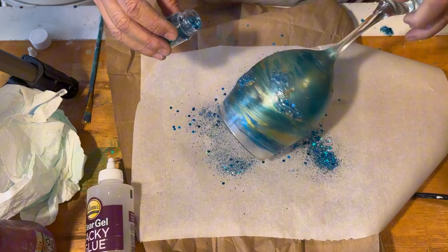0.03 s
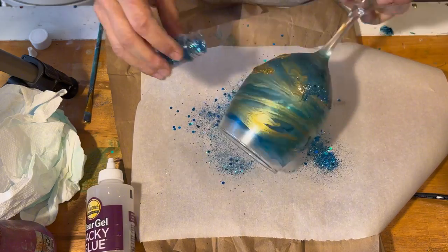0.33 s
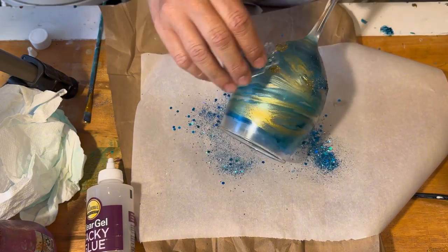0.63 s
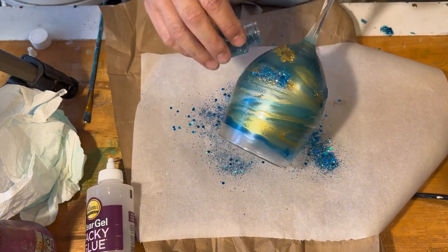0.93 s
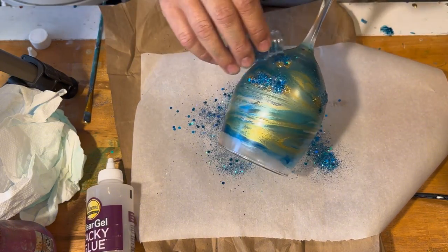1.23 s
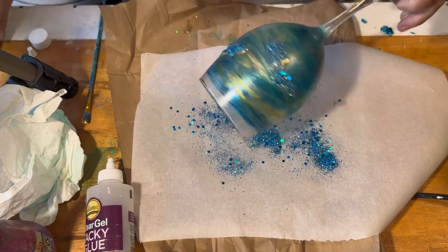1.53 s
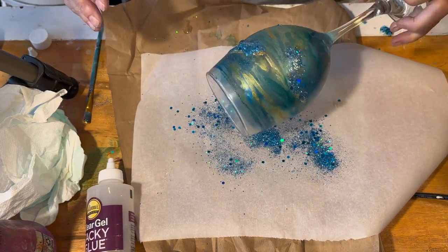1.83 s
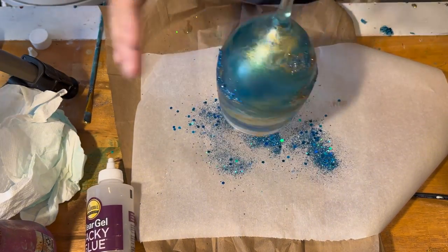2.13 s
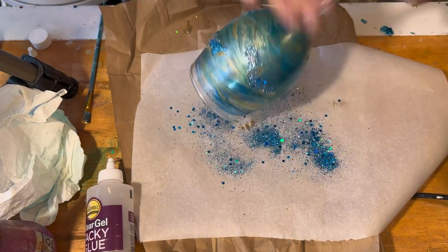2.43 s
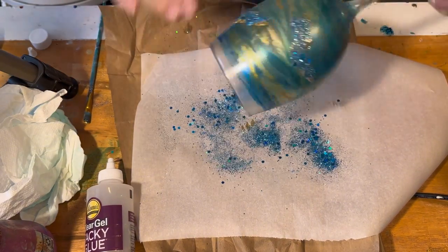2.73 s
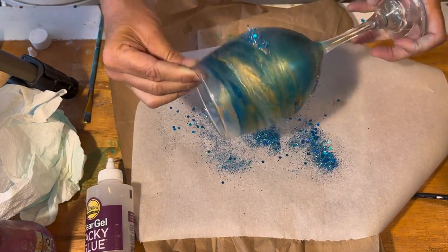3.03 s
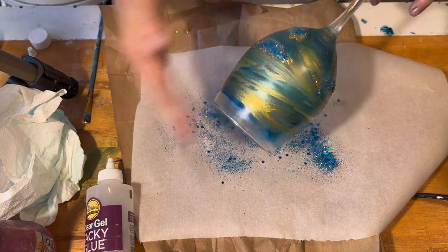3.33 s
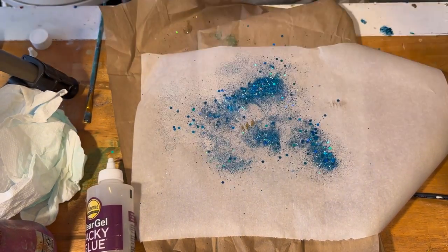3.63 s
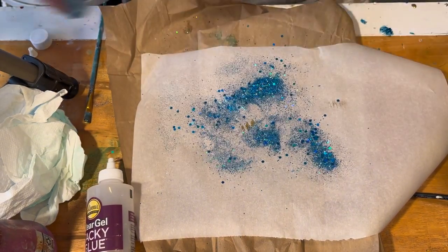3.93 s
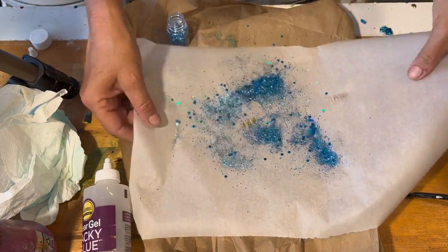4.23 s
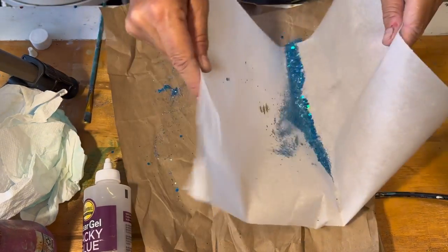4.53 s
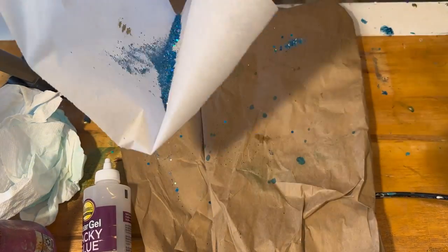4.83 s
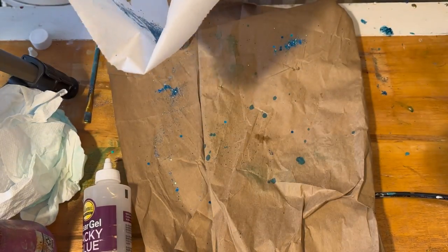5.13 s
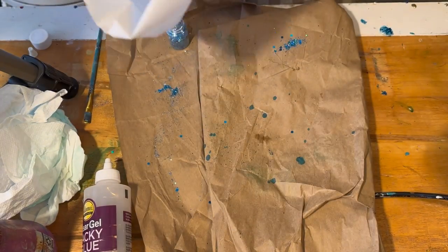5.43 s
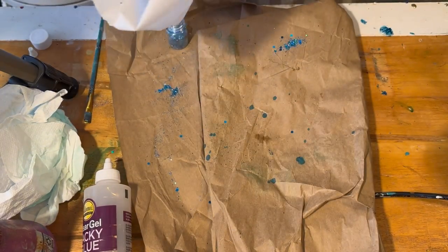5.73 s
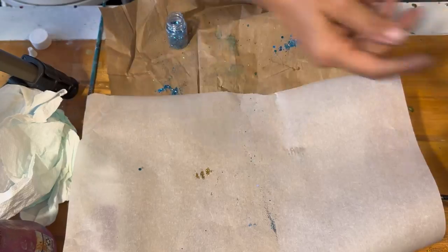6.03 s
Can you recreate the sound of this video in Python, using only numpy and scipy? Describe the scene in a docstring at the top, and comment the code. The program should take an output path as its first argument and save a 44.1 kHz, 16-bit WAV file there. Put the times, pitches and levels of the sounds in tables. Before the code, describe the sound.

A faint hum fills a small room, with a low rumble that cuts off just before 1 second. At the start a wine glass scrapes lightly on paper. Near 0.8 seconds a small jar bumps the glass with a click and hollow thud, and glitter falls in faint, bright ticks until 1.5 seconds, followed by a few dry crunches. From 2.2 to 2.7 seconds fingers tap rapidly on the glass, which rings slightly. A soft rub on the rim leads to a second, more ringing run from 3.3 to 3.5 seconds. At 3.7 seconds the glass is set down with a dull knock on covered wood. From 4 seconds baking paper is lifted and folded, rustling with sharp snaps and one brief squeak near 4.7 seconds. From 5.2 to 6 seconds it slides back with soft knocks, rustles and more creases. Everything sounds close, in stereo.

```python
"""A paper-covered table in a small room with a faint hum; a low rumble fills the opening.
Glitter is shaken from a small jar onto a wine glass: the jar knocks, flakes patter.
The glass is turned, rings a little under quick runs of finger taps, and is set down.
Then the sheet of baking paper is lifted, folded with a squeak, and slid back, rustling and creasing."""
import sys
import numpy as np
from scipy import signal
from scipy.fft import rfft, irfft, next_fast_len
from scipy.io import wavfile
from scipy.ndimage import uniform_filter1d

SR = 44100
rng = np.random.default_rng(int(sys.argv[2]) if len(sys.argv) > 2 else 0)


def wav_record(signal):
    """Record a signal, one row per channel, as 16-bit PCM in the file named by sys.argv[1]."""
    frames = np.transpose(np.atleast_2d(signal))
    bounded = np.clip(frames, -1, 1)
    # unit amplitude maps onto the largest positive 16-bit level
    quanta = np.round(bounded * 32767).astype(np.int16)
    wavfile.write(sys.argv[1], SR, quanta)


N = 267775

# side-to-mid ratio of two close microphones (frequency [Hz], level [dB])
SIDE_SPECTRUM = [(60, -72), (250, -13.5), (500, -10.5), (1000, -13), (2500, -10), (4000, -4), (8000, -11.5),
                 (13000, -15)]
# paper rustle and snaps (frequency [Hz], level [dB])
PAPER_SPECTRUM = [(40, -44), (400, -7.5), (700, -7), (1200, -9.5), (2400, -3.5), (3600, 1.5), (7000, 3.5),
                  (11000, 2.5), (14000, 4.5), (15700, 2)]
# rubbing as the sheet is lifted and folded (time [s], level [dB])
LIFT_RUB = [(4.02, -95), (4.045, -70), (4.16, -59.5), (4.21, -51.5), (4.27, -47.5), (4.35, -48.5),
            (4.435, -47), (4.485, -40.5), (4.63, -53), (4.67, -86)]
# light rubbing as the sheet sways (time [s], length [s], level [dB])
SWAY_RUBS = [(4.17, 0.038, -49), (4.672, 0.042, -49.5), (4.735, 0.066, -51.5), (4.82, 0.085, -64.5)]


def amp(db):
    """Decibels to gain."""
    return 10 ** (np.asarray(db) / 20)


def unit(x):
    """Scale to rms 1."""
    return x / np.sqrt(np.mean(x ** 2) + 1e-20)


def pan(db):
    """Channel gains for a left-minus-right level."""
    return amp(np.array([[db], [-db]]) / 2)


def clock(length_s):
    """Sample times."""
    return np.arange(round(length_s * SR)) / SR


def add(mix, start_s, sound):
    """Mix a sound in, in place."""
    part = mix[..., max(round(start_s * SR), 0):][..., :sound.shape[-1]]
    part += sound[..., :part.shape[-1]]


def level(rows):
    """Gain curve through (time [s], level [dB]), silent outside its span."""
    return amp(np.interp(np.arange(N) / SR, *np.transpose(rows), left=-200, right=-200))


def swells(rows):
    """Gain curve with one smooth hump per (time [s], length [s], level [dB])."""
    gain = np.zeros(N)
    for start_s, length_s, db in rows:
        add(gain, start_s, amp(db) * np.hanning(len(clock(length_s))))
    return gain


def read(points, hz):
    """Interpolate a table over log frequency."""
    points_hz, values = np.transpose(points)
    return np.interp(np.log(hz + 1), np.log(points_hz + 1), values)


def filtered(x, gain):
    """Zero-phase filter by gain(hz)."""
    size = next_fast_len(x.shape[-1], real=True)
    hz = np.fft.rfftfreq(size, 1 / SR)
    return irfft(rfft(x, size) * gain(hz), size)[..., :x.shape[-1]]


def colour(x, spectrum):
    """Filter by a spectrum table, to rms 1."""
    return unit(filtered(x, lambda hz: amp(read(spectrum, hz))))


def wander(rate_hz, size=N):
    """Smooth random drift, rms 1."""
    return unit(filtered(rng.standard_normal(size), lambda hz: 1 / (1 + (hz / rate_hz) ** 4)))


def stereo_noise(size=N):
    """Noise at two close microphones: bass shared, treble less so."""
    mid, side = rng.standard_normal((2, size))
    side = filtered(side, lambda hz: amp(read(SIDE_SPECTRUM, hz)))
    return np.array([mid + side, mid - side])


def grains(per_s, spread_db):
    """Random patter of tiny, uneven clicks."""
    sizes = amp(spread_db * np.minimum(rng.exponential(1, N), 3))
    hits = rng.random(N) < per_s / SR
    return unit(stereo_noise() * sizes * hits)


def patchy(x, depth_db):
    """Random gain in patches of time and frequency."""
    frames = signal.stft(x, SR, nperseg=256)[2]
    patches = uniform_filter1d(rng.standard_normal(frames.shape[1:]), size=4, axis=0)
    patches = unit(uniform_filter1d(patches, size=4, axis=1))
    return signal.istft(frames * amp(depth_db * patches), SR, nperseg=256)[1][:, :N]


def burst(spectrum, t60_s, scatter_db, treble_db=0, body_db=0, peaks=(), size=8192, echo_s=0.001024):
    """Impulse and decaying scatter through a minimum-phase filter; energy of 1 ms at rms 1."""
    t, hz = np.arange(size) / SR, np.fft.rfftfreq(size, 1 / SR)
    decay = amp(-60 * t / max(t60_s, 0.002))
    scatter = amp(scatter_db) * unit(stereo_noise(size) * decay) / np.sqrt(size)
    # a near reflection differs at the two microphones
    echo = amp(read(SIDE_SPECTRUM, hz)) * np.exp(-2j * np.pi * hz * echo_s)
    excitation = rfft(scatter) + np.array([1 + echo, 1 - echo])
    shelves_db = treble_db / (1 + (5000 / (hz + 1)) ** 4) + body_db / (1 + (hz / 1600) ** 4)
    resonances = sum(amp(peak_db) ** 2 / (1 + (2 * (hz - peak_hz) / width_hz) ** 2)
                     for peak_hz, width_hz, peak_db in peaks)
    db = read(spectrum, hz) + shelves_db + 10 * np.log10(1 + resonances)
    log_gain = np.log(amp(np.r_[db, db[-2:0:-1]]))
    response = np.exp(np.conj(signal.hilbert(log_gain)))[:len(hz)]
    return unit(irfft(excitation * response)) * np.sqrt(SR / size / 1000)


def ring(hz, t60_s, rise_s=0.00026):
    """One mode: fast rise, exponential decay."""
    t = clock(0.35)
    return np.sin(2 * np.pi * hz * t) * amp(-60 * t / t60_s) * (1 - np.exp(-t / rise_s))


def background(air_db=-67, rumble_db=-57, drone_hz=57.4, octave_db=-68, rumble_end_s=0.9):
    """Room air and a wavering hum; an opening rumble and drone stop abruptly."""
    # room air, and rumble with hiss (frequency [Hz], level [dB])
    air_spectrum = [(30, -91), (70, -39), (120, -32), (180, -14), (280, -5), (440, -12.5), (600, -10.5),
                    (760, -19), (1150, -25), (2500, -32), (4600, -42), (10000, -40), (16000, -52)]
    rumble_spectrum = [(15, -6), (45, 12.5), (120, 0.5), (200, -8), (400, -11), (900, -16.5), (2200, -20.5),
                       (4000, -30), (6500, -29), (8700, -23.5), (12000, -31.5), (16000, -29)]
    # hum tones (frequency [Hz], level [dB])
    hum_tones = [(289.6, -66), (528, -83), (601, -76)]
    # drone fundamental (time [s], level [dB])
    drone_curve = [(0, -77), (.12, -63), (.2, -44.5), (.35, -46), (.46, -63), (.6, -63.5), (.78, -54),
                   (.93, -47)]
    t = np.arange(N) / SR
    out = amp(air_db + 0.5 * wander(22)) * colour(stereo_noise(), air_spectrum)
    for hz, db in hum_tones:
        waver = 1 + 0.4 * wander(7)
        pitch_hz = hz + 2.843 * wander(8.18)
        out += amp(db) * np.sqrt(2) * waver * np.sin(2 * np.pi * np.cumsum(pitch_hz) / SR)
    phase = 2 * np.pi * drone_hz * t
    drone = level(drone_curve) * np.sin(phase) + amp(octave_db) * np.sin(2 * phase)
    rumble = amp(rumble_db) * colour(stereo_noise(), rumble_spectrum)
    gate = np.clip((rumble_end_s - t) / 0.00057, 0, 1)
    return out + (rumble + drone) * gate


def glass_scrape():
    """The glass drags over the paper and comes to rest."""
    # drag (time [s], level [dB])
    drag = [(0, -56.5), (.065, -57), (.12, -63), (.3, -74)]
    # glass on paper (frequency [Hz], level [dB])
    spectrum = [(100, -24), (200, 18), (300, 10.5), (1400, -9), (1850, 6), (1935, 12), (2020, 1),
                (2450, 2.5), (2690, 3), (2950, 6), (3300, -2), (3700, -4), (5000, -5), (10000, -10),
                (16000, -17)]
    return level(drag) * colour(grains(per_s=3400, spread_db=1.5), spectrum)


def paper_creases(gain_db=-4, clean_t60_s=0.014):
    """Large creases snap; small ones crinkle while the sheet is bent."""
    # large creases (time [s], level [dB], treble [dB], t60 [s], left minus right [dB])
    snaps = [(0.019, -37.5, 0, 0.027, 0.5), (0.058, -46.5, -15, 0.03, -0.0), (0.197, -35, -13, 0.11, -1),
             (2.6436, -29, -14, 0.047, 2), (3.914, -43.5, -25, 0.048, 1), (4.1886, -32.5, 2, 0.034, 3),
             (4.2433, -23, 8, 0.11, 0.5), (4.2811, -23, 2, 0.07, 0.5), (4.334, -31.5, -1, 0.019, 1),
             (4.345, -28, -9, 0.066, 2.0), (4.367, -24, -3, 0.019, 3.3), (4.4002, -34, -10, 0.02, 4),
             (4.45, -28, -13, 0.025, 5), (4.4738, -23.5, -2, 0.049, 2.5), (4.483, -24, -12.5, 0.036, 3),
             (4.5066, -27, -11, 0.027, 3.0), (4.5604, -28.5, -11, 0.06, 4), (4.586, -32, -14.5, 0.017, 2.5),
             (4.691, -44.5, -14, 0.22, 2), (4.709, -42, 0, 0.013, 2), (4.7436, -39.5, 4, 0.014, 1.0),
             (4.7677, -35.5, -7, 0.015, -2), (4.775, -35, -12, 0.017, 2), (4.8277, -46, -4, 0.023, 1),
             (4.845, -42.5, -8, 0.022, 0), (4.9418, -43, -7, 0.021, 0.8), (5.1424, -43.5, -13, 0.032, 1),
             (5.225, -29, -8, 0.063, 1), (5.478, -35.5, -25, 0.05, -1), (5.554, -34, -7, 0.027, 0.1),
             (5.6049, -36, -4, 0.022, -3), (5.736, -33, -6, 0.027, 2), (5.7626, -36, -14, 0.036, -0.1),
             (5.8355, -36.5, -12, 0.04, -3), (5.8568, -34, -8, 0.034, 1.1), (5.883, -30.5, -15, 0.03, 0.4),
             (5.893, -23.5, -11, 0.11, 1), (5.9107, -30, -23, 0.11, 1.1), (5.9519, -21.5, -5.5, 0.11, 0.5),
             (5.994, -33, -5, 0.033, 1)]
    out = (level(LIFT_RUB) + swells(SWAY_RUBS)) * crinkles() * pan(2)
    for start_s, db, treble_db, t60_s, pan_db in snaps:
        scatter_db = 31 * np.log10(t60_s / clean_t60_s)  # longer snaps are noisier
        snap = burst(PAPER_SPECTRUM, t60_s, scatter_db, treble_db=treble_db + 4)
        add(out, start_s, pan(pan_db) * amp(db) * snap)
    return amp(gain_db) * out


def glitter(flake_db=-6):
    """Fine glitter trickles in small spills; larger flakes land with bright ticks."""
    # spills (time [s], length [s], level [dB])
    spills = [(1.12, 0.12, -73.5), (1.26, 0.15, -75.5), (1.42, 0.08, -62.5), (1.45, .12, -73.5),
              (1.715, 0.031, -80.5)]
    # larger flakes (time [s], level [dB])
    flakes = [(0.205, -41), (0.7327, -53), (0.863, -49.5), (0.988, -50.5), (1.0292, -53.5), (1.096, -49.5),
              (1.172, -44.5), (1.214, -48.5), (1.2835, -49.5), (1.3186, -52), (1.3775, -48.5),
              (2.0304, -63), (2.1337, -66)]
    # flake impact (frequency [Hz], level [dB])
    spectrum = [(50, -66), (500, -31), (2000, -3), (3200, -15), (6000, 1.5), (10000, 4), (16000, -3.5)]
    out = swells(spills) * colour(grains(per_s=7600, spread_db=2.5), spectrum)
    for start_s, db in flakes:
        add(out, start_s, amp(db + flake_db) * burst(spectrum, t60_s=0.032, scatter_db=-1))
    return out


def jar(start_hz=850, end_hz=170, sag_s=0.00376, swell_s=0.007, table_hz=125, table_db=-36):
    """The jar bumps the glass: click, sagging hollow thud, low table note. Light taps only clink."""
    # bump and bounce (time [s], thud [dB], click [dB])
    bumps = [(0.7775, -26.5, -32.5), (.7860, -33.5, -36)]
    # bump click (frequency [Hz], level [dB])
    click_spectrum = [(200, -21), (1200, 15.5), (2400, 2), (3500, 13.5), (5500, -16), (9500, -3),
                      (16000, -26)]
    # lip taps on the glass (time [s], level [dB])
    lip_taps = [(0.988, -58), (1.222, -70), (1.446, -56)]
    # jar modes (frequency [Hz], level [dB], t60 [s])
    modes = [(2420, -4, .02), (3080, 7.5, 0.015), (3600, -8, 0.016), (5050, -6.5, .02)]
    out, t = np.zeros((2, N)), clock(0.05)
    pitch_hz = end_hz + (start_hz - end_hz) * np.exp(-t / sag_s)
    envelope = (t / swell_s) ** 2 * np.exp(2 * (1 - t / swell_s))
    thud = envelope * np.sin(2 * np.pi * np.cumsum(pitch_hz) / SR)
    for start_s, thud_db, click_db in bumps:
        add(out, start_s, amp(thud_db) * thud)
        add(out, start_s, amp(table_db) * ring(table_hz, t60_s=0.037))
        add(out, start_s, amp(click_db - 5) * burst(click_spectrum, t60_s=0.0097, scatter_db=7.5))
    clink = sum(amp(db) * ring(hz, t60_s) for hz, db, t60_s in modes)
    for start_s, db in lip_taps:
        add(out, start_s, amp(db) * clink)
    return out


def glass_crunches():
    """Dry crunches as the glass starts to roll."""
    # crunches (time [s], level [dB], t60 [s])
    crunches = [(1.555, -38.5, 0.061), (1.597, -43, 0.077), (1.6153, -44, 0.039)]
    # crunch (frequency [Hz], level [dB])
    spectrum = [(40, -45), (300, -1), (1400, 1), (2200, -8), (2800, 5.5), (3400, 0.5), (4500, 0.5),
                (7000, -8.5), (9000, -19.5), (16000, -20)]
    out = np.zeros((2, N))
    for start_s, db, t60_s in crunches:
        add(out, start_s, amp(db) * burst(spectrum, t60_s, scatter_db=10))
    return out


def glass_taps(contact_width_hz=250, rim_hz=3086, rim_width_hz=110, rattle_delay_s=0.0034):
    """Each finger tap clicks through the damped contact and rim; the bowl rings until the next tap."""
    # tap runs (time [s], level [dB], treble [dB], body [dB], contact pitch [Hz],
    # contact resonance [dB], rim ping [dB], lower mode [dB], upper mode [dB], left minus right [dB])
    taps = [(2.1949, -41.5, -14, -10, 2090, 16, 15, -91, -88, 0),
            (2.2266, -44.5, 16, 10, 2190, 12, 19, -88, -80, 0.7),
            (2.257, -37, -6, -1, 2050, 5, 3, -84, -82, -0.3),
            (2.289, -41, 12, -2, 2100, 6, -4, -84, -76, 0.8),
            (2.3223, -32.5, 23, 14, 2190, 26.5, 23.5, -77, -74, 2),
            (2.4111, -33.0, 12.5, -1, 1850, 19.5, -4, -58, -65, 1.5),
            (2.4457, -32.5, 1, -6, 1850, 11.5, 14.5, -70, -70, 1),
            (2.479, -31.5, -1, -4.5, 2120, 11.5, 7, -75, -71, 0.7),
            (2.5137, -38.8, 6, 2, 1980, -3, 9, -79, -75, 1.8),
            (2.548, -31.5, -4.5, -10.5, 2090, 11, -4, -80, -76, 1.7),
            (2.583, -35, 1, -4.5, 2030, 8.5, -5, -64, -78, 1),
            (2.6317, -30.5, 0.5, -9, 2430, -3, 9, -66, -74, 1),
            (2.6809, -27.5, 1, -9, 1900, 6, 13, -59, -72, 0),
            (2.7216, -25.5, -3.5, -15.5, 2100, 11, 4, -67, -74, 1.9),
            (3.2963, -56.5, 20, 14, 4010, 9, 17, -82, -60, 1.2),
            (3.3271, -37, -10, 1.5, 3980, 3, 16.5, -76, -55, 0),
            (3.361, -39.5, 4, -1, 4050, 20.5, 15, -68, -57, 0),
            (3.3954, -37, -6, -3.5, 4070, 5, 6, -81, -54, 0),
            (3.4316, -33.1, -7, -6.5, 4150, 11, 17.5, -72, -61, 0),
            (3.468, -31.5, -16, -10.5, 4030, 11, 14.5, -76, -58, 0.5),
            (3.5038, -29.5, -7.5, -0.5, 3960, 19.5, 23, -73, -62, -1.5)]
    # tap click (frequency [Hz], level [dB])
    spectrum = [(30, -59), (120, -10.5), (300, 11), (1000, 8.5), (1550, 3.5), (2400, 8.5), (3500, 2.5),
                (4700, -4), (6000, -4.5), (8200, -10.5), (9500, -9), (11000, -6), (12300, -14.5),
                (15500, -16)]
    # bowl modes (frequency [Hz], t60 [s])
    modes = [(4015, .25), (9850, 0.058)]
    out, t = np.zeros((2, N)), clock(0.35)
    gaps_s = np.diff([tap[0] for tap in taps], append=N / SR)
    for tap, gap_s in zip(taps, gaps_s):
        start_s, db, treble_db, body_db, contact_hz, contact_db, rim_db, *modes_db, pan_db = tap
        peaks = [(contact_hz, contact_width_hz, contact_db), (rim_hz, rim_width_hz, rim_db)]
        tone = dict(treble_db=treble_db, body_db=body_db, peaks=peaks)
        click = burst(spectrum, t60_s=0.014, scatter_db=-1, **tone)
        table_rattle = burst(spectrum, t60_s=0.051, scatter_db=25, **tone)
        add(out, start_s, amp(db - 0.36) * pan(pan_db) * click)
        add(out, start_s + rattle_delay_s, amp(db - 11) * table_rattle)
        damping = np.exp(-np.maximum(t - gap_s, 0) / 0.003)
        for (hz, t60_s), mode_db in zip(modes, modes_db):
            add(out, start_s, amp(mode_db) * ring(hz, t60_s) * damping)
    return out


def fingertip():
    """Soft rubbing on the rim draws out the highest mode of the glass."""
    # brushes (time [s], length [s], level [dB])
    brushes = [(2.832, 0.18, -74), (3.059, 0.036, -67)]
    # rubbed rim (frequency [Hz], level [dB])
    spectrum = [(300, -42), (3000, -18), (3900, -17), (4015, -4), (4130, -18.5), (8500, -20), (9600, -16),
                (9868, 4.5), (10150, -9), (11800, -21), (12600, -10), (13400, -21), (16000, -30)]
    return swells(brushes) * colour(stereo_noise(), spectrum)


def table_knocks(gain_db=-3):
    """Dull knocks on wood through layers of paper."""
    # contacts (time [s], level [dB], treble [dB], t60 [s])
    knocks = [(3.7109, -25.5, -10.5, 0.052), (3.7155, -40, -21, 0.044), (3.774, -47, -52, 0.11),
              (3.838, -53, -30, 0.073), (3.896, -45, -37, 0.14), (4.037, -37, 15, 0.084),
              (5.228, -41, -19, 0.062), (5.332, -42.5, -14, .06)]
    # covered wood (frequency [Hz], level [dB])
    spectrum = [(30, -30), (120, -16), (220, -1), (400, 7), (620, 10), (950, 9), (1300, 4.5), (1600, 1.5),
                (1950, 6), (2700, -9.5), (4600, -9), (6000, -27), (15000, -37.5)]
    out = np.zeros((2, N))
    for start_s, db, treble_db, t60_s in knocks:
        knock = burst(spectrum, t60_s, scatter_db=0.5, treble_db=treble_db + 14)
        add(out, start_s, amp(db + gain_db) * knock)
    return out


def paper_rub(rustle_db=-2, clump_db=3, lift_flex_db=-11, slide_flex_db=-8):
    """Fibres catch in clumps of tiny grains and the sheet flexes, both following the rubbing."""
    # rubbing as the sheet slides back (time [s], level [dB])
    slide_rub = [(4.93, -69), (5.18, -70.5), (5.235, -51.5), (5.44, -55.5), (5.59, -43), (5.82, -50.5),
                 (5.91, -49.5), (5.995, -57), (6.04, -82)]
    # dull flexing (frequency [Hz], level [dB])
    flex_spectrum = [(30, -66), (150, -18), (400, 1), (800, -1), (1400, -4.5), (2800, -5.5), (4500, -7),
                     (8000, -14.5), (16000, -53)]
    lift, slide = level(LIFT_RUB) + swells(SWAY_RUBS), level(slide_rub)
    clumps = amp(clump_db * np.clip(wander(130), -2, 2))
    fibres = patchy(1.3 * grains(per_s=3400, spread_db=1) + stereo_noise(), depth_db=2.5)
    rustle = amp(rustle_db) * (lift + slide) * colour(fibres * clumps, PAPER_SPECTRUM) * pan(1)
    flex = colour(patchy(stereo_noise(), depth_db=2), flex_spectrum)
    return rustle + (amp(lift_flex_db) * lift + amp(slide_flex_db) * slide) * flex


def crinkles(per_s=120, range_db=12):
    """Small creases snap, uneven in timing and size."""
    out = np.zeros((2, N))
    for slot, (jitter, strength) in enumerate(rng.random((int(per_s * N / SR), 2))):
        snap = burst(PAPER_SPECTRUM, t60_s=0.0034, scatter_db=13, size=1024)
        add(out, (slot + jitter) / per_s, amp(range_db * strength - 11) * snap)
    return out


def paper_squeak(octave_db=-20, octave_fade_s=0.026, flutter=0.08):
    """The fold rubs with a nearly pure tone; its octave fades as the rubbing settles."""
    # squeak contour (time [s], pitch [Hz], level [dB])
    contour = [(4.677, 1470, -76), (4.68, 1390, -48), (4.684, 1090, -39.5), (4.692, 1005, -37),
               (4.701, 1106, -34.5), (4.715, 1105, -36), (4.734, 1050, -70)]
    times_s, hz, db = np.transpose(contour)
    start_s = times_s[0]
    out, t = np.zeros((2, N)), start_s + clock(times_s[-1] - start_s)
    phase = 2 * np.pi * np.cumsum(np.interp(t, times_s, hz)) / SR
    octave = amp(octave_db) * np.exp(-((t - start_s) / octave_fade_s) ** 4) * np.sin(2 * phase)
    envelope = amp(np.interp(t, times_s, db)) * (1 + flutter * wander(320, len(t)))
    add(out, start_s, envelope * (np.sin(phase) + octave))
    return out


def room(x, build_s=0.0064):
    """Short diffuse tail of a small room."""
    # reverberation (frequency [Hz], t60 [s])
    decay_times = [(200, 0.071), (1000, 0.091), (4000, 0.061), (14000, 0.092)]
    hz, t, frames = signal.stft(stereo_noise(SR // 3), SR, nperseg=256)
    decay = amp(-60 * t / read(decay_times, hz)[:, None])
    tail = signal.istft(frames * decay, SR, nperseg=256)[1]
    tail *= np.minimum(np.arange(tail.shape[1]) / SR / build_s, 1)
    return signal.fftconvolve(x, tail / np.linalg.norm(tail[0]), axes=1)[:, :N]


def scene(room_db=-15):
    """Close sources on the table, their reverberation, and the background."""
    near = glass_taps() + fingertip() + glass_scrape() + glass_crunches() + table_knocks()
    near += jar() + glitter()
    near += paper_rub() + paper_creases() + paper_squeak()
    return near + amp(room_db) * room(near) + background()


def record(dry):
    """Band limit at 15.9 kHz."""
    lowpass = signal.firwin(401, 15900, window=("kaiser", 8), fs=SR)
    return signal.oaconvolve(dry, lowpass[None], "same")


dry = scene()
out = record(dry)
wav_record(out)
```